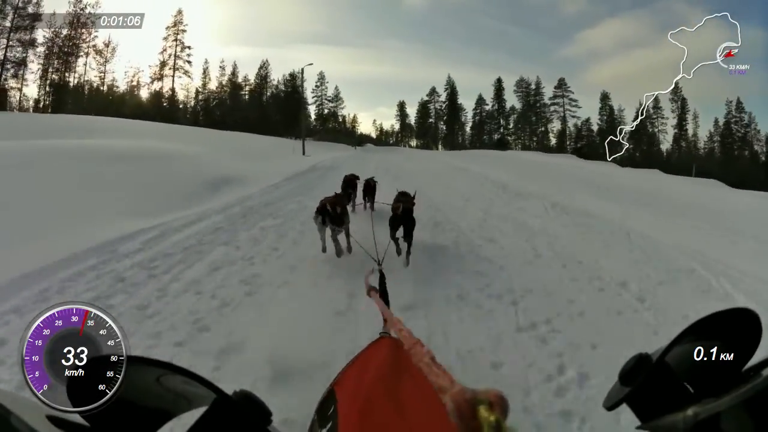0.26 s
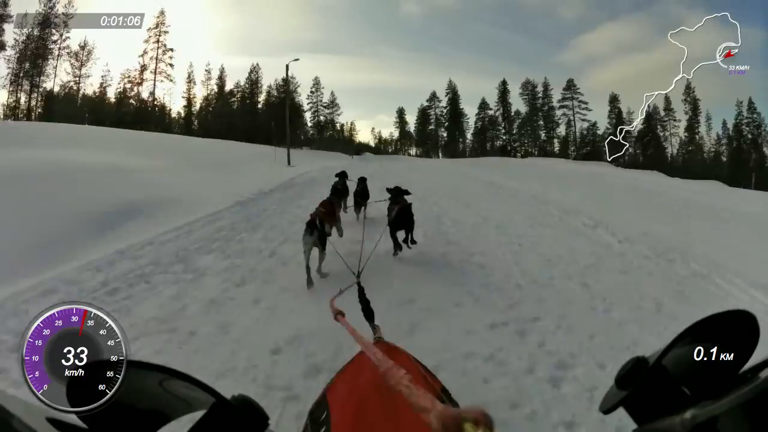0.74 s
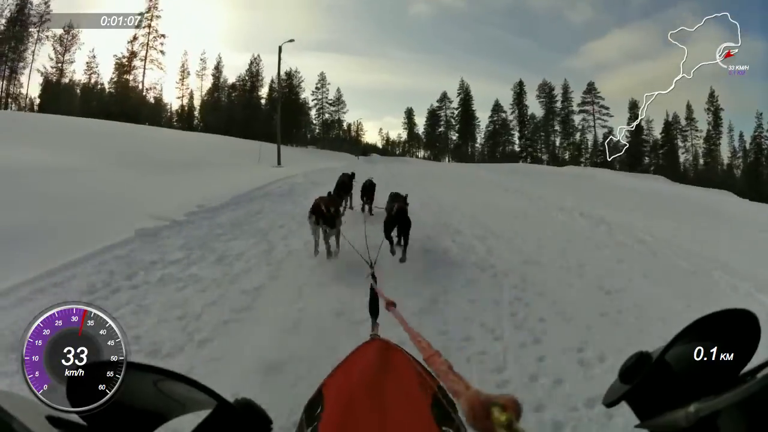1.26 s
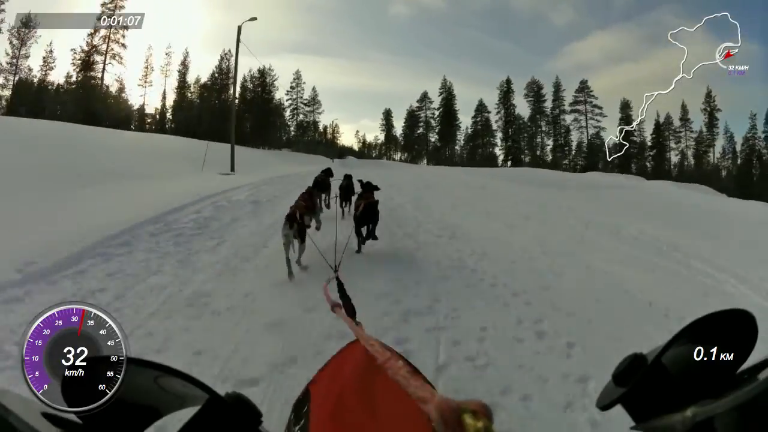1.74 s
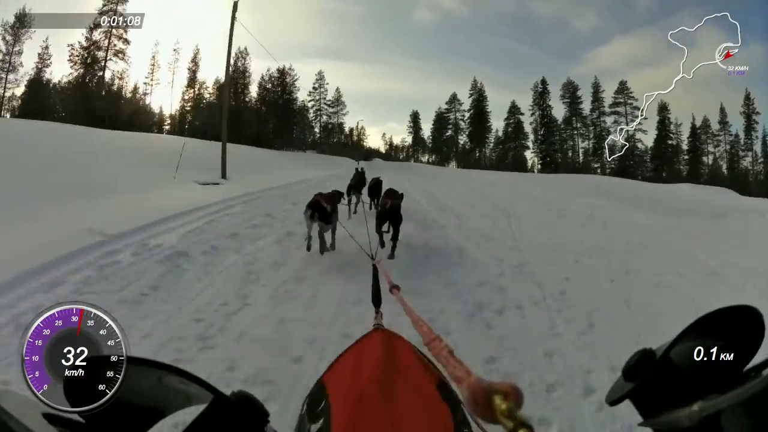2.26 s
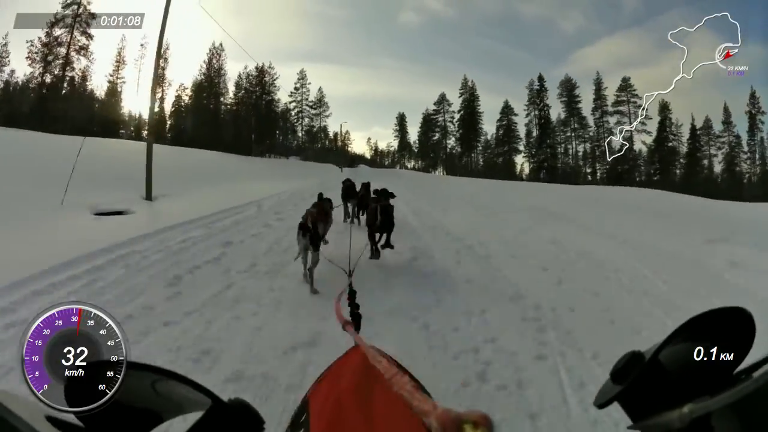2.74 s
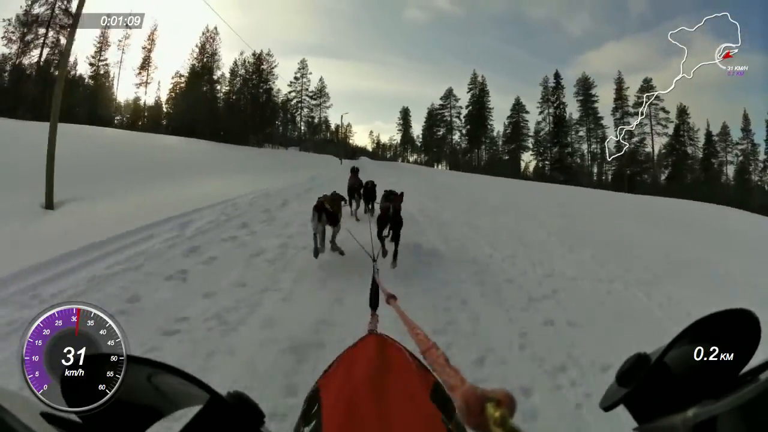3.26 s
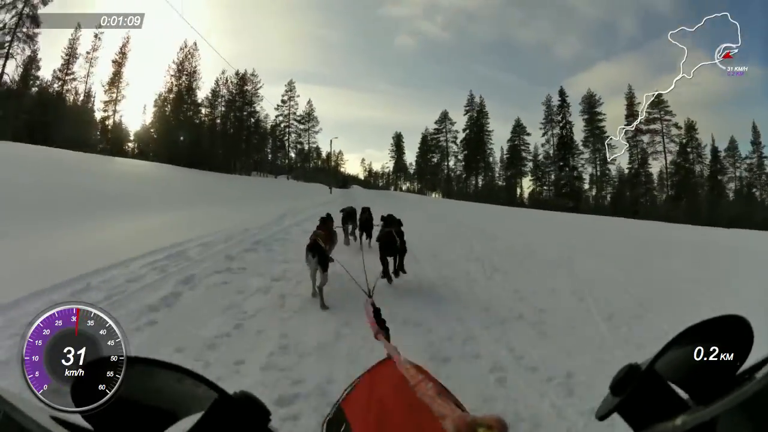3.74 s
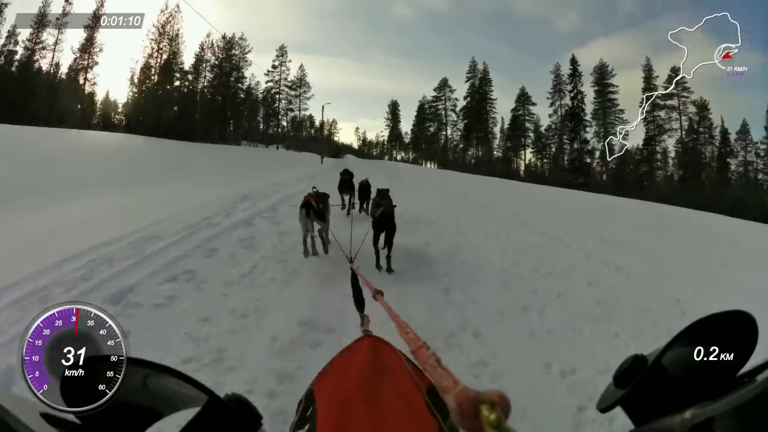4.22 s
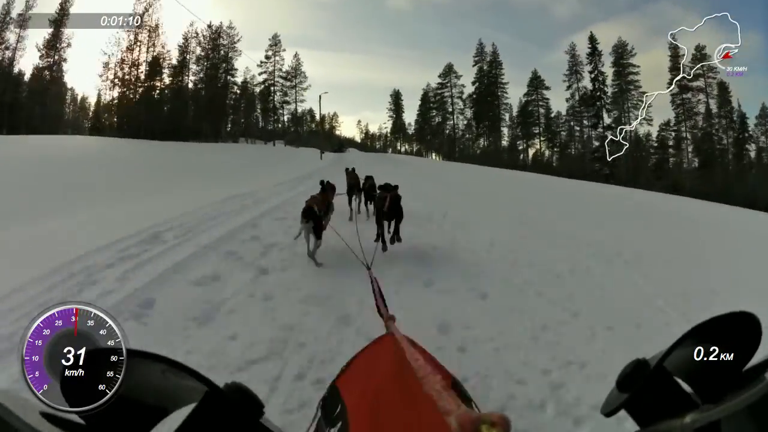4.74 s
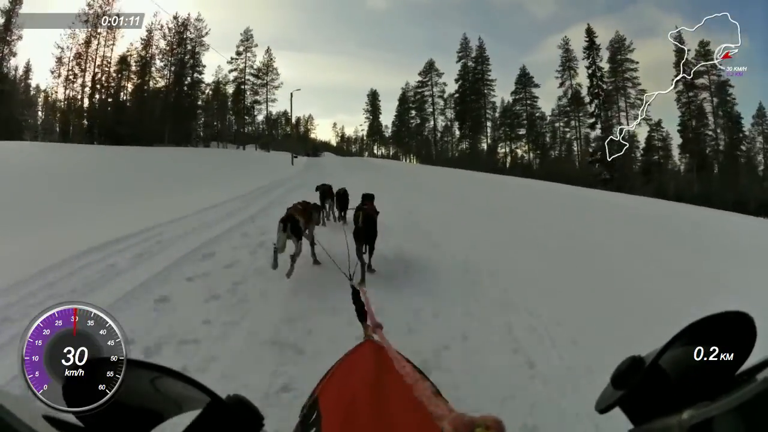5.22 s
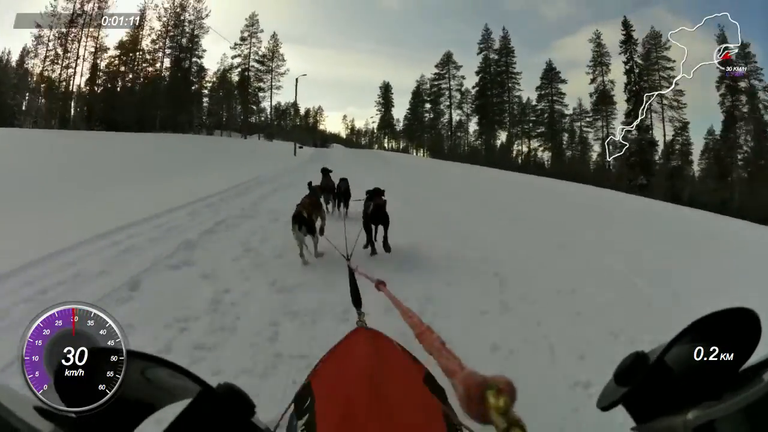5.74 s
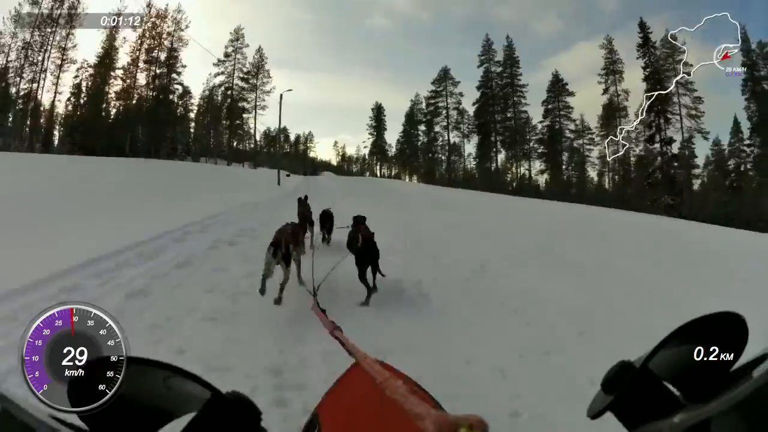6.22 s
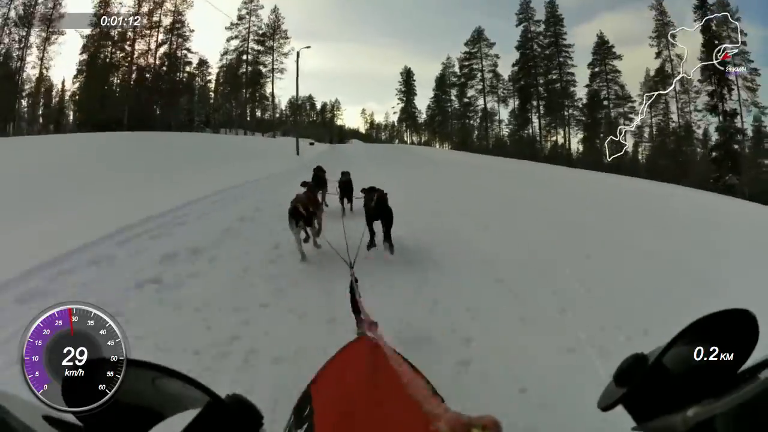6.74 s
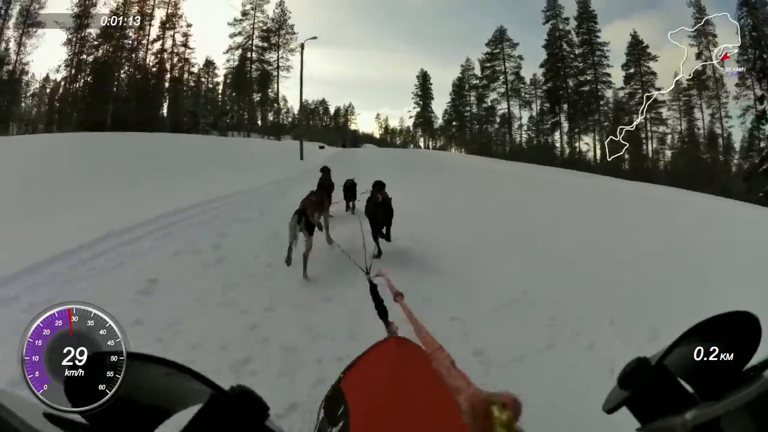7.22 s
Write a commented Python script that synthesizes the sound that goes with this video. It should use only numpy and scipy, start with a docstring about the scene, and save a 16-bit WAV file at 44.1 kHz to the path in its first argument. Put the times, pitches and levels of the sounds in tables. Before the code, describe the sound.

Sled runners rattle and scrape along a bumpy snow trail at speed, with knocks, brief skids and sharp crackling snaps, heard close.

```python
"""A dog sled's runners drum and scrape fast along a packed snow trail, and its frame rings with them.
The microphone rides on the frame, close to the runners. Over crests the sled goes light, then skids.
Bumps thud through it and crush the crust, loose fittings click, joints creak and crumbs of snow
tick against it, all over a low shaking. The hardest jolts overload the microphone with a snap."""
import sys
import numpy as np
from scipy import signal
from scipy.fft import rfft, irfft
from scipy.io import wavfile
from scipy.ndimage import map_coordinates

SR = 44100
rng = np.random.default_rng(int(sys.argv[2]) if len(sys.argv) > 2 else 0)


def wav_out(sig):
    """Save sig, one row per channel (or a flat mono array), as 16-bit PCM at SR to the path in sys.argv[1]."""
    wavfile.write(sys.argv[1], SR, np.round(np.clip(np.atleast_2d(sig).T, -1, 1) * 32767).astype(np.int16))


N = 329868
TIME = np.arange(N) / SR

# the hardest bumps in the trail: time_s, level_db, pitch_hz
BUMPS = [(0.029, -1.5, 290), (0.1009, 0.5, 485), (0.321, -11, 90), (0.4117, -8, 310), (0.5118, -1.5, 254),
         (0.5988, -14, 88), (0.9778, -8, 245), (0.993, -3, 176), (1.365, -2.5, 275), (1.3791, 0, 324),
         (1.4045, -8, 446), (1.5133, 6.5, 194), (1.5872, -3.5, 327), (1.6788, 3, 250), (2.047, -15, 574),
         (2.076, -6.5, 453), (2.2992, 1.5, 326), (2.413, 4, 370), (2.6992, -4, 555), (2.7184, 2, 364),
         (2.79, -8, 515), (2.8615, -13, 96), (2.8875, -6.5, 318), (3.029, -4, 324), (3.1458, 0.5, 312),
         (3.2301, 4.5, 270), (3.2462, 0.5, 197), (3.2627, -5, 230), (3.525, -4, 344), (3.5972, -5.5, 394),
         (3.657, -7, 380), (3.762, 1, 300), (3.8107, -1.5, 274), (3.9233, 3.5, 377), (3.929, -3.5, 410),
         (3.9335, -1, 397), (3.9569, -2, 411), (4.2775, -5.5, 507), (4.3872, -10, 480), (4.3915, -5.5, 310),
         (4.428, -4.5, 300), (4.4682, -6.5, 85), (4.572, -4, 300), (4.664, 1, 110), (4.678, -5.5, 580),
         (4.7368, -5.5, 880), (4.7397, 0.5, 330), (4.7456, -5, 480), (4.751, -9, 85), (4.7997, -1.5, 510),
         (4.8498, -3, 278), (4.942, -4.5, 493), (5.309, 6.5, 277), (5.3415, -11.5, 444), (5.3702, -6, 348),
         (5.5474, 10, 183), (6.127, -5, 426), (6.161, -8.5, 85), (6.195, 5.5, 220), (6.4141, -4.5, 643),
         (6.4346, -1, 221), (6.7503, -2, 355), (6.848, -2.5, 500), (7.0205, -7, 480), (7.1211, 1.5, 216),
         (7.275, -3.5, 268), (7.3756, 8, 312), (7.414, -1, 280), (7.433, 2, 173), (7.4423, 11, 266)]
# crests where the sled goes light, then skids: start_s, length_s, drum_loss_db, skid_db
CRESTS = [(0.449, 0.022, 6.5, 1), (2.088, 0.092, 3.5, 2.5), (2.918, 0.036, 5, 5.5), (3.016, 0.035, 7, -0.5),
          (3.078, 0.03, 11.5, 8.5), (3.665, 0.035, 16.5, -6.5), (3.777, 0.033, 9, 2), (3.831, 0.086, 8, 14),
          (4.427, 0.225, 10, 11), (4.688, .038, 9, 6), (5.376, 0.15, 4, 20.5), (6.201, 0.25, 4.5, 10),
          (6.313, 0.039, 6.5, 3.5), (7.028, 0.092, 5.5, -1), (7.153, 0.12, 7.5, 12)]
# spectrum of scraping snow: frequency_hz, level_db
SCRAPE_SPECTRUM = [(200, -19.5), (700, 7), (1200, 16), (3000, -1.5), (3300, -9.5), (4300, -7), (5650, -20),
                   (5950, -22), (7000, -26.5), (10000, -34), (15000, -52.5)]
# spectrum of a dry scuff or crackle: frequency_hz, level_db
SCUFF_SPECTRUM = [(1500, -16.5), (3400, 9), (4000, 2.5), (4400, 6.5), (4800, -12), (5200, -0.5),
                  (5600, -1.5), (6000, -12), (6800, -27), (9500, -46), (15000, -59.5)]


def runners(drum_db=-19.0, scrape_db=0.75, bounce=0.2, skid_share=0.68, scrape_loss=0.56):
    """Lumps drum on the runners and ice grains scrape; on a crest both fade and the runners bounce."""
    # spectrum of the drumming: frequency_hz, level_db
    drum_spectrum = [(35, -46.5), (60, -32), (112, 1), (449, 0.5), (493, -1), (1280, -17.5), (1520, -23.5),
                     (1720, -29), (1920, -28.5), (2210, -36.5), (2500, -36.5), (3250, -55), (5500, -120)]
    # strength of the scraping along the trail: time_s, level_db
    scrape_levels = [(0.0, -35.5), (0.8, -39), (1.08, -38.5), (1.83, -43.5), (2.21, -40.5), (2.9, -44),
                     (3.3, -42.5), (3.75, -40), (3.87, -46.5), (4.12, -38.5), (4.35, -48.5), (4.54, -39),
                     (4.66, -37.5), (5.23, -43), (5.48, -46), (5.58, -39), (6.15, -42.5), (6.48, -36.5),
                     (6.65, -38), (6.83, -42), (7.23, -45), (7.48, -41)]
    chatter, patches = wobble(hz=70), wobble(hz=20)  # the contact and the snow, shared by both sounds
    light_db = lightness()
    drum = colour(grains(per_s=3500, spread_db=0.27), drum_spectrum)
    drum = evened(drum * gain_of((1 + bounce * light_db) * chatter + patches))
    scrape = colour(grains(per_s=9000, spread_db=2.5), SCRAPE_SPECTRUM)
    scrape = flexing(frame(scrape), share=0.012, hz=8)
    scrape = evened(scrape * gain_of(2 * chatter + 0.8 * patches))
    trail_db = curve(scrape_levels) + skid_share * skidding() - scrape_loss * light_db
    return gain_of(drum_db - light_db) * drum + gain_of(scrape_db + trail_db) * scrape


def lightness(lift_s=0.015, settle_s=0.022):
    """The drumming lost, in dB, as the weight leaves the runners on each crest and returns."""
    loss_db = np.zeros(N)
    for start, length, db, _ in CRESTS:
        lifted = np.clip((TIME - start) / lift_s + 0.5, 0, 1)
        still_light = np.clip((start + length - TIME) / settle_s + 0.5, 0, 1)
        loss_db += db * lifted * still_light
    return loss_db


def skidding(rise_s=0.11, fall_s=0.06):
    """The skid's strength, on a decibel scale: it swells up to each landing and dies after it."""
    skid_db = np.zeros(N)
    for start, length, _, db in CRESTS:
        since_landing = TIME - start - length
        skid_db += db * np.exp(-(since_landing / np.where(since_landing < 0, rise_s, fall_s)) ** 2)
    return skid_db


def frame(force):
    """A force rings the damped modes of the sled's frame."""
    # modes of the frame: pitch_hz, width_hz, level_db
    modes = [(1074, 210, -4), (1450, 220, -14), (1664, 54, 1), (1760, 290, -5.5), (2182, 260, 1),
             (2300, 110, -20.5), (2810, 190, -8), (3640, 180, -18.5), (4350, 110, -10.5),
             (5300, 360, -13.5), (5500, 240, -21)]
    t = np.arange(SR // 10) / SR
    ring = sum(gain_of(db) * width * np.exp(-np.pi * width * t) * np.cos(2 * np.pi * hz * t)
               for hz, width, db in modes)
    return signal.oaconvolve(force, ring / np.linalg.norm(ring))[:len(force)]


def flexing(x, share, hz):
    """The frame flexes, so every pitch in x wanders by a small share."""
    return map_coordinates(x, [np.cumsum(1 + share * wobble(hz))], order=3, mode="mirror")


def bumps(level_db=-5.0, rise_s=0.0009, fall_s=0.0015, soft_hz=240, knock_db=-12, knock_hz=750):
    """A bump knocks on a runner and flexes the sled; low, soft bumps last longer and knock less."""
    out, t = np.zeros(N), np.arange(-SR // 50, SR // 20) / SR
    knock = gain_of(knock_db) * np.exp(-(t / 0.0017) ** 2) * np.cos(2 * np.pi * knock_hz * t)
    for s, db, hz in BUMPS:
        softness = np.hypot(1, soft_hz / hz)
        swing = pulse(t / softness, rise_s, fall_s, rounding=0.5) * np.cos(2 * np.pi * hz * t)
        add(out, s + t[0], gain_of(db + level_db) * (swing + knock / softness))
    give = 0.85  # the frame flexes only so far
    return give * np.tanh(out / give)


def crunches(level_db=-21, rise_s=0.0055, fall_s=0.0037, hard_hz=400):
    """Each bump crushes the crust under the runner; the quick, hard ones crunch most."""
    # spectrum of crushed snow: frequency_hz, level_db
    crush_spectrum = [(200, -21.5), (650, 9), (1100, -2.5), (2200, -17), (3300, -35.5), (5500, -48.5),
                      (8000, -78)]
    pressure = np.zeros(N)
    for s, db, hz in BUMPS:
        envelope = np.exp(-abs(TIME - s) / np.where(TIME < s, rise_s, fall_s))
        pressure += gain_of(db) * (hz / hard_hz) ** 2 * envelope
    crust = evened(colour(grains(per_s=8900, spread_db=2.0), crush_spectrum))
    return gain_of(level_db) * pressure * crust


def clicks(note_hz=1698, note_s=0.0015, wood_hz=900, wood_s=0.002, contact_s=0.000376,
           crack_s=0.0012, rattle_db=-22, rattle_s=0.01):
    """A loose fitting hits the frame: its own note, a woody thud, the frame's ring, a rattling crack."""
    # strikes of the fittings: time_s, level_db, crack_db, crack_top_hz
    strikes = [(0.377, -38, -43, 6300), (0.728, -27, -47, 5240), (0.7775, -32, -51, 5200),
               (0.882, -32, -43, 8100), (0.902, -20, -34, 5400), (0.9892, -19.5, -42.5, 5850),
               (1.231, -26, -41, 5800), (1.411, -25.5, -42, 7400), (1.4424, -24.5, -41.5, 5400),
               (1.5113, -21, -29.5, 7740), (1.5234, -21.5, -35, 5870), (1.528, -24.5, -44, 5950),
               (1.6572, -42, -53, 6300), (1.663, -27, -40, 5950), (1.6763, -39, -50, 7200),
               (2.022, -36.5, -52, 5200), (2.17, -36, -43, 6300), (2.1943, -26.5, -45, 6400),
               (2.2798, -19, -29, 7900), (2.298, -26, -40, 6500), (2.4048, -26, -48, 6440),
               (2.412, -22.5, -35.5, 7000), (2.434, -28, -52, 5240), (2.584, -34, -50, 6100),
               (2.815, -39, -50, 5860), (2.871, -31, -44.5, 5700), (3.0617, -31.5, -50, 6500),
               (3.242, -42, -29.5, 7500), (3.631, -32, -48.5, 5450), (3.696, -25.5, -44, 5500),
               (3.7512, -27, -38, 5600), (3.8172, -32.5, -52, 4950), (4.4983, -25, -38.5, 5540),
               (4.53, -17.5, -40, 5400), (4.7281, -19, -28, 5000), (4.7355, -15.5, -43, 5470),
               (4.762, -19, -38, 5000), (4.791, -31, -58, 5000), (5.1472, -26.5, -65, 5200),
               (5.2763, -28, -57.5, 5600), (5.437, -25.5, -46, 5500), (5.45, -29, -40, 5400),
               (5.464, -21, -47, 5000), (5.5454, -19, -43, 6500), (5.6605, -16, -31, 6540),
               (5.697, -27, -61, 5900), (5.739, -27.5, -39, 5330), (5.7904, -28, -58, 5370),
               (5.837, -31.5, -58, 5600), (6.1753, -27, -46, 6100), (6.191, -22, -28.5, 7600),
               (6.29, -27, -59, 5770), (6.3054, -19, -37, 5600), (6.416, -25, -54, 5500),
               (6.4374, -19, -30, 7250), (6.4602, -21, -37, 5400), (6.8527, -39, -42.5, 7200),
               (7.043, -30, -53, 5260), (7.0806, -26, -46, 5700), (7.234, -17.5, -40, 5740),
               (7.2412, -31, -49, 5700), (7.43, -20, -44, 7400)]
    # spectrum of a click's first instant: frequency_hz, level_db
    crack_spectrum = [(1000, -21.5), (2500, -3), (3300, -3), (3700, 4), (4100, 3), (4400, 0), (4800, -10.5),
                      (5100, -8), (5600, -5.5), (6000, -17), (6500, -12.5), (7000, -22), (7700, -21.5),
                      (9000, -36), (15000, -52)]
    out, t = np.zeros(N), np.arange(SR // 15) / SR
    head = slice(SR // 250)  # the first four milliseconds set the level
    onset = (1 - np.exp(-t / contact_s)) ** 2
    impact = np.sqrt(contact_s * SR) * np.sinc((t - 2 * contact_s) * SR)
    rattle = onset * (np.exp(-t / crack_s) + gain_of(rattle_db) * np.exp(-t / rattle_s))
    for s, db, crack_db, top_hz in strikes:
        noise = rng.standard_normal(len(t))
        force = impact + noise * rattle
        # pitches and colour vary with the place struck
        note = np.sin(2 * np.pi * note_hz * (1 + 0.022 * noise[0]) * t) * np.exp(-t / note_s) * onset
        wood = np.sin(2 * np.pi * wood_hz * (1 + 0.24 * noise[1]) * t) * np.exp(-t / wood_s) * onset
        spot_spectrum = np.multiply(crack_spectrum, [np.exp(0.054 * noise[2]), 1])
        lowpass = signal.butter(12, top_hz, fs=SR, output="sos")
        crack = signal.sosfilt(lowpass, colour(force, spot_spectrum))
        ring = frame(colour(force, SCRAPE_SPECTRUM))
        parts = [(note, db - 4), (wood, db - 6.5), (ring, db - 3), (crack, crack_db)]
        add(out, s, sum(gain_of(part_db) * part / part[head].std() for part, part_db in parts))
    return out


def creaks(bend=0.248, bend_s=0.0042, rasp_fall_s=0.0018):
    """A joint slips under load: a gritty rasp around a brief note that bends up as it grips again."""
    # slips of the frame's joints: time_s, note_db, pitch_hz, rasp_db
    slips = [(0.612, -35.5, 2580, -38), (0.929, -30, 2000, -40), (0.9814, -22, 2170, -41),
             (2.1576, -26, 2200, -32), (3.0001, -19, 2020, -28), (3.0075, -22, 2090, -19),
             (3.0174, -25, 2330, -42), (3.4168, -36, 2250, -32), (3.8577, -23.5, 2190, -32),
             (3.865, -34, 2240, -32), (3.872, -24, 2380, -25), (4.7292, -8.5, 2302, -17),
             (5.11, -29, 2430, -29.5), (5.167, -39, 2150, -33), (6.422, -28, 2170, -25),
             (6.4286, -4, 2410, -16.5)]
    # spectrum of a slipping joint: frequency_hz, level_db
    rasp_spectrum = [(400, -10.5), (1100, 0.5), (1450, -9), (1650, 10), (1950, -2.5), (2300, 6),
                     (2600, -11.5), (2850, 1.5), (3300, -24), (4000, -26), (4400, -14), (4800, -36),
                     (5500, -31), (6400, -44), (7500, -58.5), (15000, -78.5)]
    out, t = np.zeros(N), np.arange(-SR // 100, SR // 40) / SR
    slip = pulse(t, rise_s=0.001, fall_s=0.00099)
    grind = pulse(t, rise_s=0.0012, fall_s=rasp_fall_s)
    for s, note_db, hz, rasp_db in slips:
        noise = rng.standard_normal(len(t))
        pitch_hz = hz * (1 + bend * np.tanh(t / bend_s))
        note = slip * np.sin(2 * np.pi * np.cumsum(pitch_hz) / SR)
        rasp = colour(grind * noise * abs(noise), rasp_spectrum)
        rasp /= rasp[abs(t) < rasp_fall_s].std()
        add(out, s + t[0], gain_of(note_db) * note + gain_of(rasp_db) * rasp)
    return out


def overloads(relax_s=0.00053, crackle_db=-24, crackle_s=0.0088):
    """The microphone overloads on the hardest jolts: a sharp snap, then a short crackle."""
    # overloads on the hardest jolts: time_s, level_db
    jolts = [(1.513, -22), (2.3, -24), (3.23, -20), (3.243, -25), (4.7422, -31), (5.3082, -24),
             (5.5473, -14), (6.1937, -21.5), (6.4284, -15), (7.3742, -13.5), (7.415, -22), (7.4425, -18)]
    # spectrum of a snap: frequency_hz, level_db
    snap_spectrum = [(100, 8.5), (5000, 0.5), (8000, -5), (11500, -9.5), (13000, -19), (15000, -29.5)]
    out, t = np.zeros(N), np.arange(SR // 30) / SR
    snap = -colour(np.exp(-t / relax_s), snap_spectrum)  # a step against the swing of the jolt
    for s, db in jolts:
        crackle = colour(rng.standard_normal(len(t)) * np.exp(-t / crackle_s), SCUFF_SPECTRUM)
        add(out, s, gain_of(db) * (snap + gain_of(crackle_db) * crackle))
    return out


def heave(level_db=2.0, jolt_db=-29, jolt_s=0.025, slow_hz=200):
    """The whole sled shakes on the uneven trail and shudders at each bump, most at the slow ones."""
    # spectrum of the shaking: frequency_hz, level_db
    shake_spectrum = [(12, -35), (25, -20), (45, -15), (75, 1), (120, -6.5), (200, -3.5), (400, -17),
                      (5000, -140)]
    # strength of the shaking along the trail: time_s, level_db
    shake_levels = [(0, -29), (0.3, -31), (0.8, -30.5), (1.4, -33.5), (1.8, -36.5), (2.05, -31.5),
                    (3.2, -28.5), (3.4, -41), (3.8, -22.5), (4.15, -38), (4.5, -26.5), (4.75, -26),
                    (4.9, -36), (5.5, -26), (5.95, -40), (6.2, -24.5), (6.85, -32.5), (7.48, -25.5)]
    # spectrum of the shudder at a bump: frequency_hz, level_db
    shudder_spectrum = [(20, -21.5), (45, -14), (80, 3), (170, -7.5), (300, -14), (3000, -130)]
    shake = evened(colour(rng.standard_normal(N), shake_spectrum))
    shudder = evened(colour(rng.standard_normal(N), shudder_spectrum))
    jolts = sum(gain_of(db + jolt_db) * slow_hz / hz * np.exp(-((TIME - s) / jolt_s) ** 2)
                for s, db, hz in BUMPS)
    return gain_of(level_db + curve(shake_levels)) * shake + jolts * shudder


def crumbs(level_db=-4.0, crumble_s=0.00083):
    """A larger crumb of snow breaks on the sled in one dry scuff."""
    # crumbs that hit the sled: time_s, level_db
    hits = [(0.233, -48), (0.4255, -47), (0.5473, -50), (0.7553, -50), (1.2063, -50), (1.463, -55),
            (1.503, -42), (1.743, -51), (1.757, -51), (1.9314, -51), (1.957, -48), (1.966, -56),
            (1.975, -59), (2.0496, -52), (2.0876, -53), (2.1235, -50), (2.2632, -51), (2.3556, -51),
            (2.3631, -59), (2.9115, -47), (2.9543, -50), (3.96, -56), (4.62, -46), (5.3578, -46),
            (5.368, -47), (5.6207, -48), (5.9956, -49), (6.4927, -54), (6.775, -45), (6.783, -45),
            (7.0929, -48), (7.135, -48)]
    out, t = np.zeros(N), np.arange(SR // 30) / SR
    for s, db in hits:
        scuff = colour(rng.standard_normal(len(t)) * t * np.exp(-t / crumble_s), SCUFF_SPECTRUM)
        add(out, s, gain_of(db + level_db) * scuff / scuff[:SR // 250].std())
    return out


def spray(level_db=-26, crumble_s=0.00079, skid_share=0.25):
    """Fine crumbs land on the sled in tiny ticks, louder in loose snow and in a skid."""
    # loose snow thrown onto the sled: time_s, level_db
    spray_levels = [(0, -43), (1.2, -44), (1.7, -49), (2.1, -42), (2.6, -46), (3.1, -37.5), (3.35, -46.5),
                    (3.9, -43.5), (4.3, -45), (4.65, -39.5), (5.0, -48), (5.5, -48), (5.8, -44), (6.1, -45),
                    (6.5, -41), (7.0, -47), (7.48, -41)]
    t = np.arange(SR // 30) / SR
    landings = abs(grains(per_s=220, spread_db=2))
    crumbling = signal.oaconvolve(landings, t * np.exp(-t / crumble_s))[:N]
    ticks = evened(colour(crumbling * rng.standard_normal(N), SCUFF_SPECTRUM))
    return gain_of(level_db + curve(spray_levels) + skid_share * skidding()) * ticks


def gain_of(db):
    """Decibels to amplitude."""
    return 10 ** (np.asarray(db) / 20)


def evened(x):
    """Scales to rms 1."""
    return x / np.sqrt(np.mean(x ** 2) + 1e-20)


def add(mix, s, sound):
    """Mixes a sound in at s seconds."""
    part = mix[max(round(s * SR), 0):][:len(sound)]
    part += sound[:len(part)]


def curve(points):
    """The level in dB at every sample, from rows of time_s, level_db."""
    return np.interp(TIME, *np.transpose(points))


def pulse(t, rise_s, fall_s, rounding=1):
    """An envelope with a bell-shaped rise, a rounded peak at t = 0 and an exponential fall."""
    return np.exp(-np.where(t < 0, (t / rise_s) ** 2 / 2, np.hypot(t / fall_s, rounding) - rounding))


def colour(x, spectrum, size=4096):
    """Minimum-phase filter shaped by rows of frequency_hz, level_db."""
    hz, db = np.transpose(spectrum)
    bin_hz = abs(np.fft.fftfreq(size, 1 / SR))
    log_gain = np.log(gain_of(np.interp(np.log(bin_hz + 1), np.log(hz), db)))
    response = np.fft.ifft(np.exp(np.conj(signal.hilbert(log_gain)))).real
    return signal.oaconvolve(x, response[:size // 2] * np.hanning(size)[size // 2:])[:len(x)]


def wobble(hz):
    """Slow random motion of rms 1, with up to about hz changes a second."""
    rolloff = np.exp(-(np.fft.rfftfreq(N, 1 / SR) / hz) ** 2)
    return evened(irfft(rfft(rng.standard_normal(N)) * rolloff, N))


def grains(per_s, spread_db):
    """Random tiny impacts of either sign; spread_db makes a few larger than the rest."""
    size = gain_of(spread_db * np.minimum(rng.exponential(1, N), 4))
    return evened(size * rng.standard_normal(N) * (rng.random(N) < per_s / SR))


def scene():
    """The ride as it reaches the one microphone through the sled, with the snaps of its overloads."""
    ride = runners() + heave() + bumps() + crunches()
    return (ride + clicks() + creaks() + overloads() + spray() + crumbs())[None]


def record(dry):
    """The microphone on the frame sheds the deepest bass and top treble and flattens the loudest jolts."""
    low_cut_hz, overload_hz, top_hz = 27, 6000, 15800
    ceiling, knee = 0.72, 12
    picked_up = signal.sosfilt(signal.butter(2, low_cut_hz, "highpass", fs=SR, output="sos"), dry)
    limited = picked_up / (1 + abs(picked_up / ceiling) ** knee) ** (1 / knee)
    # only the part of each peak below overload_hz is taken off
    excess = signal.sosfiltfilt(signal.butter(2, overload_hz, fs=SR, output="sos"), picked_up - limited)
    band_limit = signal.firwin(511, top_hz, window=("kaiser", 9), fs=SR)
    return signal.oaconvolve(picked_up - excess, band_limit[None], "same")


dry = scene()
out = record(dry)
wav_out(out)
```